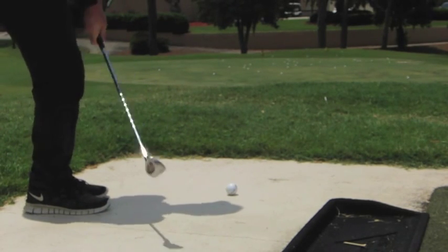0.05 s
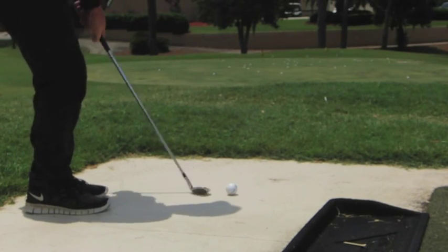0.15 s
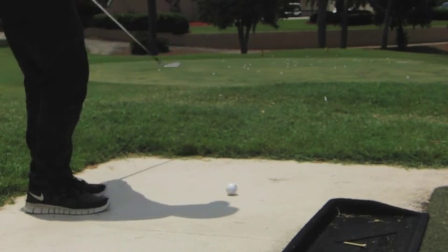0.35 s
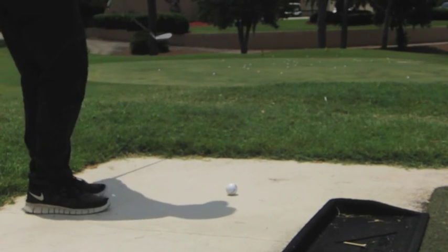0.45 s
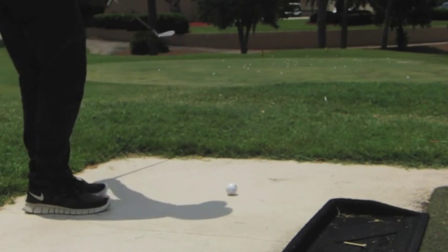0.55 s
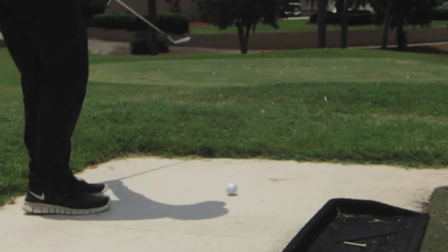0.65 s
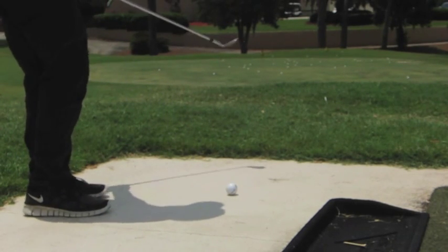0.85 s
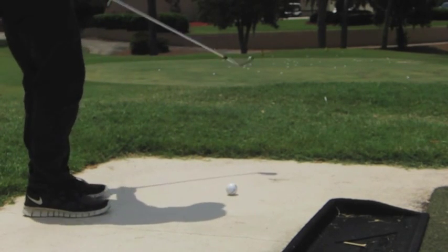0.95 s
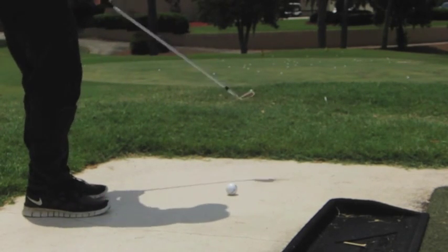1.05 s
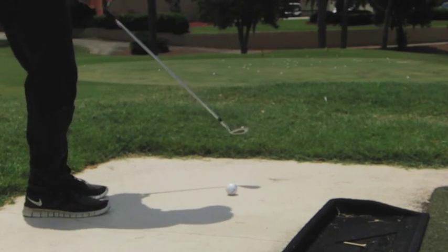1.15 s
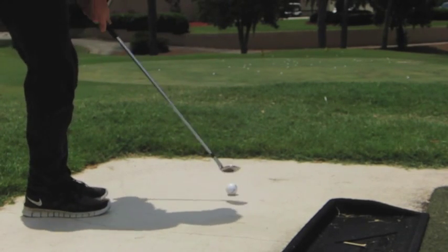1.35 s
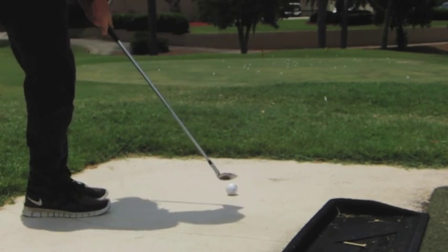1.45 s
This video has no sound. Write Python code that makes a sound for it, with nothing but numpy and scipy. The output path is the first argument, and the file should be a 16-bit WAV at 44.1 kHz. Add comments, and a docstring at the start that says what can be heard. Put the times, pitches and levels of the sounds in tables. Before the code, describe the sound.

A golf club knocks once, sharply, on a concrete slab over quiet outdoor noise.

```python
"""A golf club knocks once on a concrete slab outdoors: a dull touch and thud, then a hard crack that
excites the briefly ringing modes of the club head and crushes some grit. The player's shoes and
clothes then rustle faintly, and the ground scatters these sounds. A far engine drones under the open
air, and the camera adds its own hiss, a thin whine and a few narrow dips in the treble."""
import sys
import numpy as np
from scipy import signal
from scipy.fft import rfft, irfft
from scipy.io import wavfile

SR = 44100
rng = np.random.default_rng(int(sys.argv[2]) if len(sys.argv) > 2 else 0)


def transcribe(signal):
    """Save signal, clipped to [-1, 1], as a 16-bit WAV file at the path in sys.argv[1]."""
    frames = np.atleast_2d(signal).T
    limited = np.clip(frames, -1, 1)
    pcm = np.round(limited * 32767).astype(np.int16)
    wavfile.write(sys.argv[1], SR, pcm)


N = 66150


def club_knock():
    """Impact and modal ringing: contact pulses radiate, and the hardest drives the head's damped modes."""
    # the club's sole grazes the slab (time [s], gain [dB])
    grazes = [(.205, -1), (0.2068, -4)]
    # spectra of the graze, the head's weight landing and the crack (frequency [Hz], relative level [dB])
    touch_spectrum = [(60, -30), (450, -22), (900, -12.5), (1650, 1), (2400, -11), (4500, -27),
                      (16000, -55)]
    thud_spectrum = [(40, -48), (120, -21), (178, 3), (240, -5), (310, -5.5), (470, 0.5), (600, -15.5),
                     (700, -16.5), (780, -9.5), (900, -26), (1050, -12.5), (1500, -17.5), (4000, -37),
                     (16000, -61)]
    crack_spectrum = [(60, -43), (500, -22), (1000, -23), (1500, -8.5), (2200, 1), (3000, -1.4),
                      (3800, -6.5), (4600, -19.5), (5700, -29.5), (7000, -22), (9000, -20), (10500, -32.5),
                      (12000, -35.5), (16000, -39)]
    # modes of the club head (frequency [Hz], impulse response level [dB], time to fall 60 dB [s])
    head_modes = [(1540, -30.5, 0.018), (1800, -37, 0.02), (2170, -35.5, 0.011), (2540, -40.5, 0.012),
                  (2894, -33, 0.012), (3410, -45, .016), (3750, -25, 0.01), (4640, -36, 0.015),
                  (5100, -23.5, 0.0099), (7330, -29, 0.007), (11340, -17.5, 0.007), (12250, -18, .007)]
    # grit crushed under the sole (frequency [Hz], relative level [dB])
    grit_spectrum = [(100, -13), (900, -11), (2300, -1.5), (3700, 2), (4700, -3.5), (5700, -26),
                     (7200, -11), (9000, -24), (10500, -19), (11700, -18.5), (13300, -20), (16000, -23)]
    thud_s, crack_s, ring_rise_s = 0.2062, 0.2079, 0.00035
    touch = sum(amp(db) * pulse(start, touch_spectrum) for start, db in grazes)
    thud = amp(12) * pulse(thud_s, thud_spectrum)
    crack = amp(13) * pulse(crack_s, crack_spectrum)
    t = since(0)
    modes = sum(amp(db) * decay(0, t60) * np.cos(2 * np.pi * hz * t) for hz, db, t60 in head_modes)
    build_up = 1 - np.exp(-t / ring_rise_s)
    ring = signal.fftconvolve(crack, modes * build_up)[:N]
    grit = amp(-26.5) * noise(grit_spectrum) * decay(crack_s, t60_s=0.017)
    return touch + thud + crack + ring + grit


def player_rustle():
    """Friction and fracture: shoes and clothes scuff softly, and one grain snaps under a shoe."""
    # scuffs (time [s], duration [s], level [dB])
    strokes = [(0.646, 0.084, -59), (0.903, 0.026, -58), (0.961, .07, -63), (1.27, 0.057, -61.5),
               (1.385, 0.028, -57.5)]
    # spectra of the rubbing and the snap (frequency [Hz], relative level [dB])
    scuff_spectrum = [(200, -14), (1500, -15), (2400, -1), (3100, -2), (4500, -12), (12000, -28)]
    snap_spectrum = [(200, -12), (1400, -11), (2000, -8), (2700, -4), (3500, 8), (4400, -1), (5100, -24),
                     (16000, -32)]
    rubbing = sum(amp(db) * arch(start, length) for start, length, db in strokes)
    scuffs = noise(scuff_spectrum) * rubbing
    snap = amp(-44.5) * noise(snap_spectrum) * decay(1.2838, t60_s=0.015)
    return scuffs + snap


def ground_scatter(direct):
    """Diffuse reflection: the ground adds a short, weak tail to the direct sound."""
    tail = rng.standard_normal(N) * decay(0, t60_s=0.11)
    tail /= np.linalg.norm(tail)
    return direct + amp(-35) * signal.fftconvolve(direct, tail)[:N]


def open_air():
    """Ambient noise: a broadband rumble whose level flutters and swells very slightly."""
    # outdoor rumble and air (frequency [Hz], relative level [dB])
    air_spectrum = [(15, -21), (35, -17.5), (62, 3.5), (95, -1.5), (130, 1), (220, -4), (320, -9.5),
                    (500, -16), (1000, -21), (2500, -25), (3600, -28.5), (6000, -39.5), (16000, -43.5)]
    level_db, swell_db_per_s, flutter_db = -49, 0.1, 0.5
    swell_db = swell_db_per_s * (since(0) - N / SR / 2)
    return noise(air_spectrum) * amp(level_db + swell_db + flutter_db * drift(rate_hz=11))


def far_engine():
    """Harmonic series: low engine orders share one wavering rate; the drone fades, then returns."""
    # engine orders (multiple of the base rate, relative level [dB])
    orders = [(2, -5), (3, -1.5), (4, -8), (5, -20)]
    # envelope of the drone (time [s], level [dB])
    envelope = [(0, -51.5), (.5, -68), (.7, -50.5), (.95, -53), (1.5, -48.5)]
    base_hz, waver = 57.97, 0.00898
    turns = np.cumsum(base_hz * (1 + waver * drift(rate_hz=7.83))) / SR
    drone = sum(amp(db) * np.sin(2 * np.pi * (order * turns + rng.random())) for order, db in orders)
    level_db = np.interp(since(0), *np.transpose(envelope))
    return unit_rms(drone) * amp(level_db)


def camera_noise():
    """Self-noise: steady hiss and thin tones with slight random frequency modulation."""
    # whining tones (frequency [Hz], rms deviation [Hz], level [dB])
    tones = [(1868, 9.1, -75.5), (2213, 8.1, -73), (4428, 12, -69), (6890, 74, -81), (8820, 34.8, -78.5),
             (15735, 1.8, -83)]
    # hiss (frequency [Hz], relative level [dB])
    hiss_spectrum = [(100, -13), (4800, 6.5), (5800, -4), (8000, 0), (9300, 2), (10900, 5.5), (12000, 0.5),
                     (15700, -0.5)]
    whine = np.zeros(N)
    for hz, waver_hz, db in tones:
        cycles = np.cumsum(hz + waver_hz * drift(rate_hz=46.6)) / SR
        whine += amp(db) * unit_rms(np.sin(2 * np.pi * cycles))
    return amp(-65.5) * noise(hiss_spectrum) + whine


def amp(db):
    """Amplitude ratio of a level in decibels."""
    return 10 ** (np.asarray(db) / 20)


def unit_rms(x):
    """Normalisation to rms 1."""
    return x / np.sqrt(np.mean(x ** 2) + 1e-20)


def gain_curve(spectrum):
    """Gain at each Fourier bin, from levels interpolated over log frequency."""
    hz, db = np.transpose(spectrum)
    bin_hz = np.fft.rfftfreq(N, 1 / SR)
    return amp(np.interp(np.log(bin_hz + 1), np.log(hz + 1), db))


def noise(spectrum):
    """Spectral shaping: coloured noise of rms 1."""
    white = rfft(rng.standard_normal(N))
    return unit_rms(irfft(white * gain_curve(spectrum), N))


def drift(rate_hz):
    """Random fluctuation: low-passed noise of rms 1."""
    white = rfft(rng.standard_normal(N))
    rolloff = (1 + (np.fft.rfftfreq(N, 1 / SR) / rate_hz) ** 2) ** 2
    return unit_rms(irfft(white / rolloff, N))


def since(start_s):
    """Seconds elapsed since the start, zero before it."""
    return np.maximum(np.arange(N) / SR - start_s, 0)


def decay(start_s, t60_s):
    """Exponential damping: a sudden onset that falls 60 dB in t60_s."""
    t = since(start_s)
    return (t > 0) * np.exp(-np.log(1000) * t / t60_s)


def arch(start_s, length_s):
    """Half-sine envelope: one rise and fall."""
    return np.sin(np.pi * np.minimum(since(start_s) / length_s, 1))


def pulse(start_s, spectrum):
    """Minimum phase: the Hilbert transform of the log gain gives the phase of a causal pulse."""
    log_gain = np.log(gain_curve(spectrum))
    mirrored = np.concatenate([log_gain, log_gain[-2:0:-1]])
    response = np.exp(np.conj(signal.hilbert(mirrored)))[:len(log_gain)]
    return np.roll(irfft(response, N), round(start_s * SR))


def scene():
    """Superposition: the near sounds, their scatter and the background add in one channel."""
    near = ground_scatter(club_knock() + player_rustle())
    return (near + open_air() + far_engine() + camera_noise())[None]


def record(dry):
    """Filtering: the camera cuts narrow notches in the treble, then limits the bandwidth."""
    # treble notches (frequency [Hz], width [Hz])
    notches = [(4050, 390), (6240, 600), (7800, 480), (10180, 1040)]
    notch_floor_db, cutoff_hz = -22.5, 16050
    for hz, width in notches:
        notched = signal.lfilter(*signal.iirnotch(hz, hz / width, SR), dry)
        dry = notched + amp(notch_floor_db) * (dry - notched)
    low_pass = signal.firwin(601, cutoff_hz, window=("kaiser", 8), fs=SR)
    return signal.oaconvolve(dry, low_pass[None], "same")


dry = scene()
out = record(dry)
transcribe(out)
```